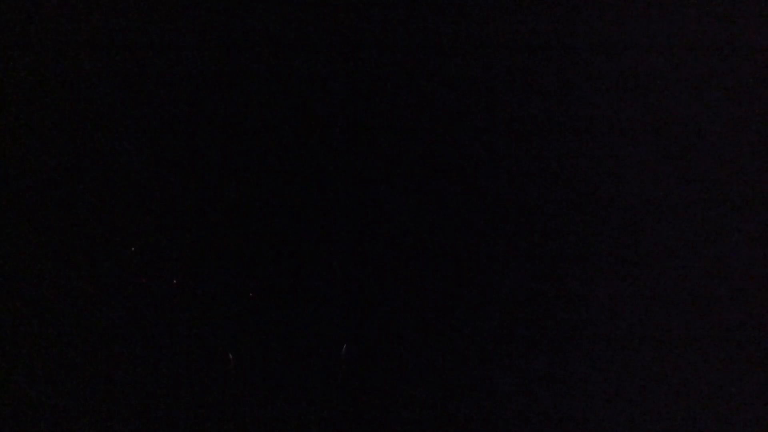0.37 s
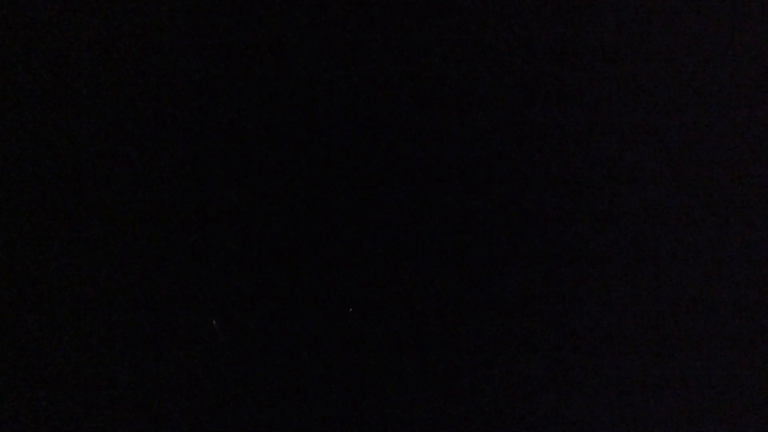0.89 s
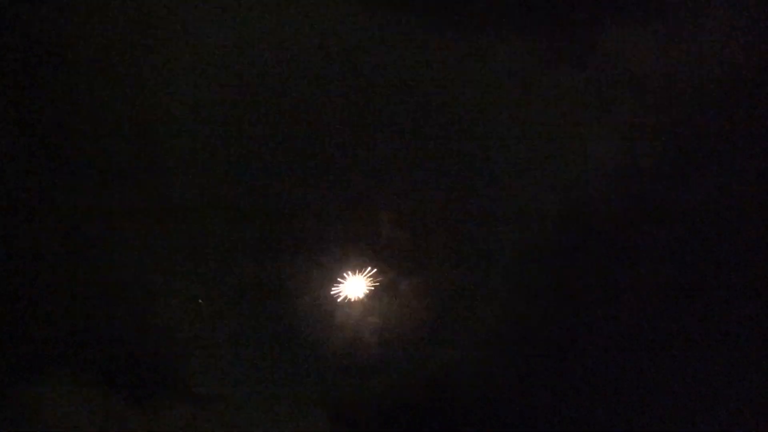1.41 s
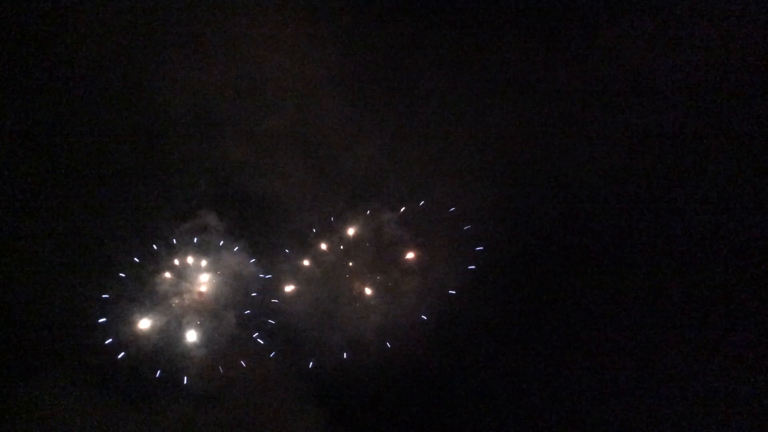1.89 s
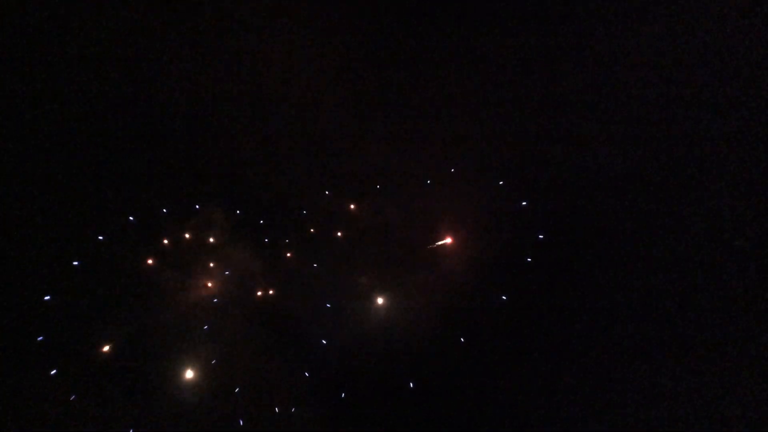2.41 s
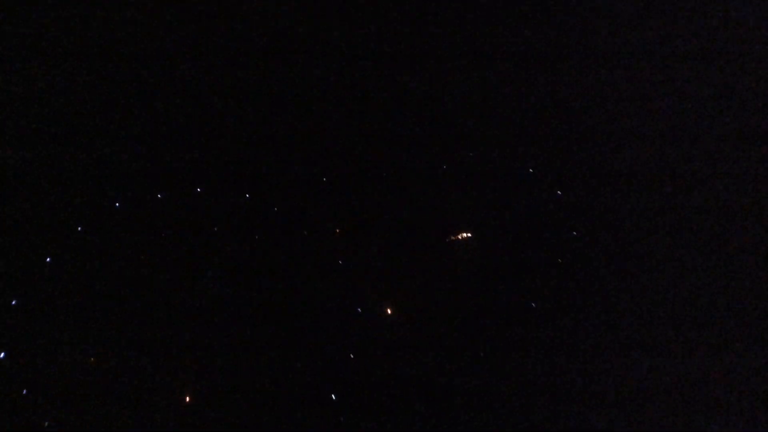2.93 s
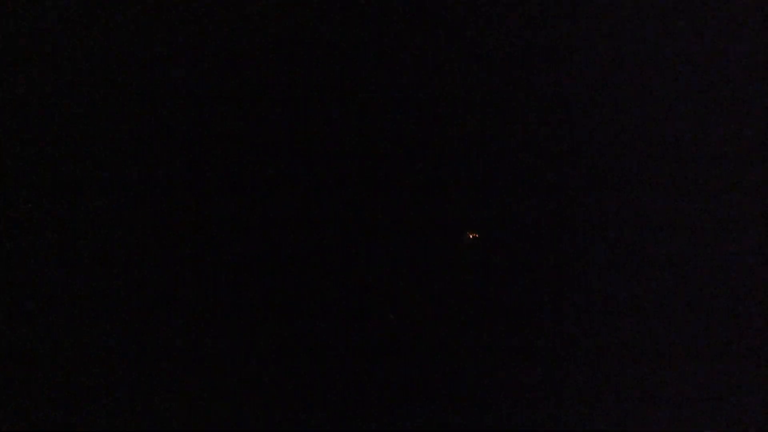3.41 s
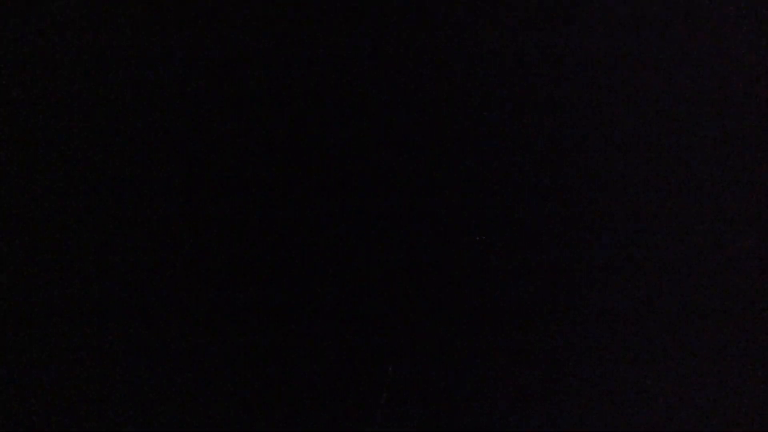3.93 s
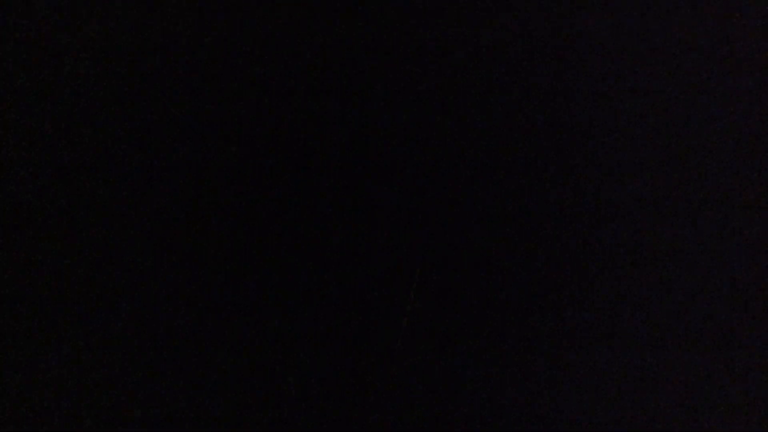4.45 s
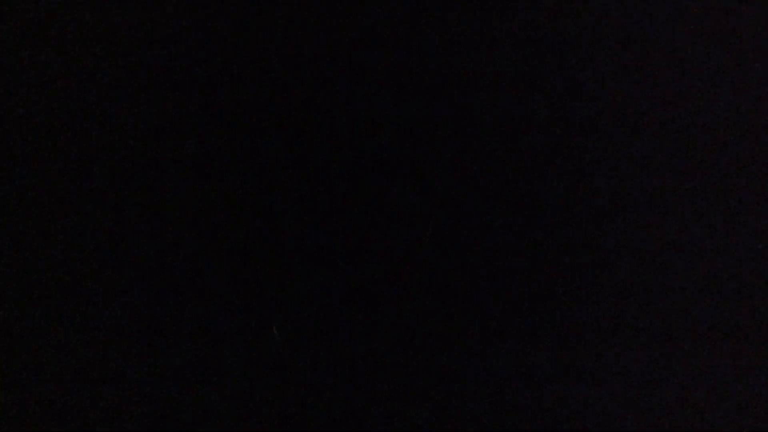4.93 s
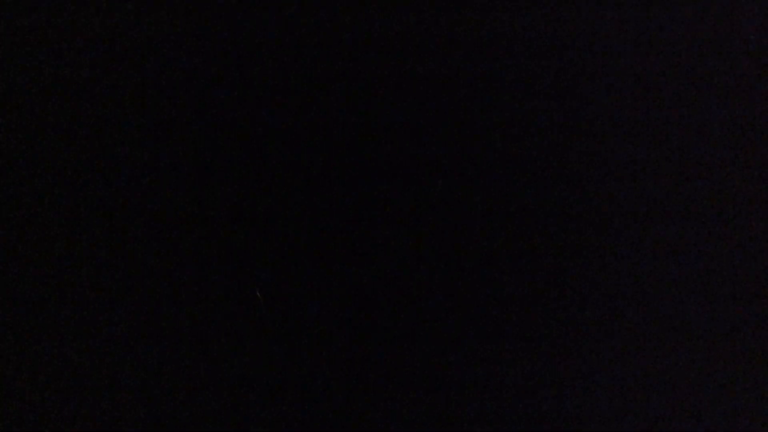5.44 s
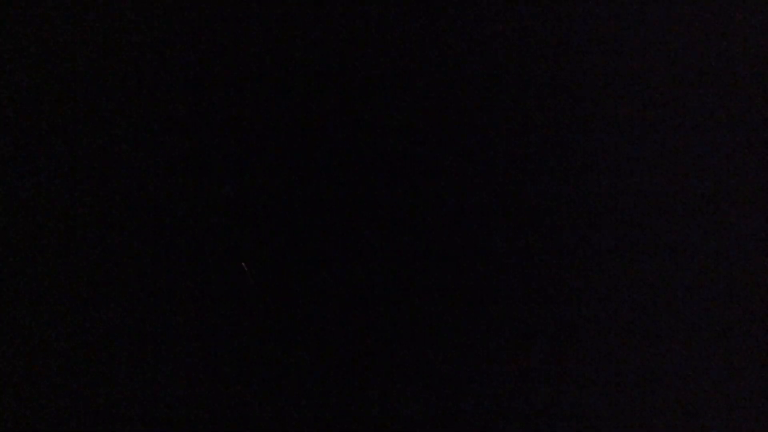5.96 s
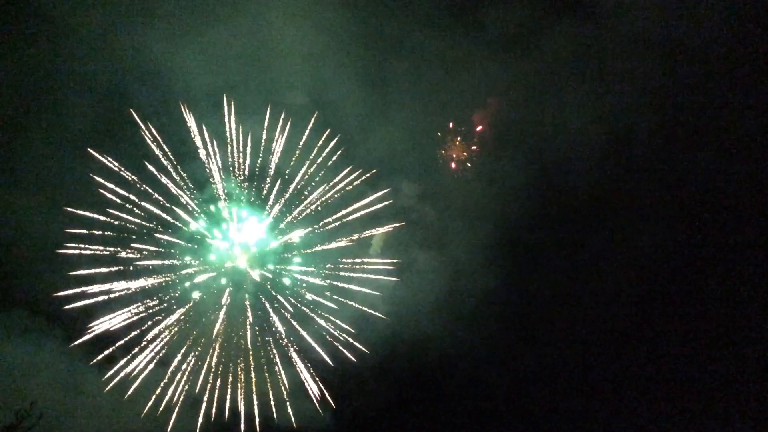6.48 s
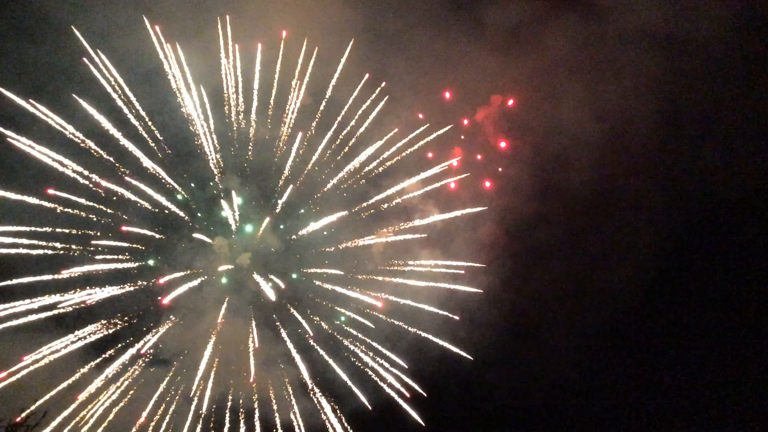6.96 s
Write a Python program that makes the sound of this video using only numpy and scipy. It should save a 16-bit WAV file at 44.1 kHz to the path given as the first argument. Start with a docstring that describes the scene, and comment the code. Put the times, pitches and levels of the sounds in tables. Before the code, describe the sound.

Outdoors at night, the dull roll of an earlier firework fades over low distant rumble and faint rasping crickets. Around two seconds, two hard shell bangs come close together with thuds and small cracks, their echoes rolling back from trees. A tight run of distant hollow mortar launches follows, then a quiet wait with crickets. Near the end two more sharp bangs burst, their echoes cut short. Small microphone, bass-thin, loud peaks rounded.

```python
"""The fading roll of a firework burst is heard first, over a low distant rumble and rasping bush crickets.
More shells burst overhead in the night and mortars launch others from a field. Each bang is a short pressure
wave that slaps off the ground and nearby walls, then rolls back from a far tree line as thousands of small
reflections, duller the longer their path. Crickets are noise scraped in strokes through ringing wings."""
import sys
import numpy as np
from scipy import signal
from scipy.io import wavfile
from scipy.ndimage import uniform_filter1d

SR = 44100
rng = np.random.default_rng(int(sys.argv[2]) if len(sys.argv) > 2 else 0)


def transcribe(u):
    """Save the signal u as a 16-bit wav file named by the first command-line argument.

    u: samples, shape (n,) or (channels, n), limited to [-1, 1]; the rate is SR.
    q: integer samples, one column per channel.
    """
    v = np.clip(np.atleast_2d(u).T, -1, 1)
    q = np.round(v * 32767).astype(np.int16)
    wavfile.write(sys.argv[1], SR, q)


def voltage_ratio(level):
    """Linear amplitude factor for a level in decibels (scalar or array-like)."""
    return 10 ** (np.asarray(level, float) / 20)


N = 313110  # length of the scene in samples
WALL_S = .0122  # delay of the slap from the nearest wall, in seconds


def evened(x):
    """Scales to rms 1."""
    return x / np.sqrt(np.mean(x ** 2) + 1e-20)


def read(points, hz):
    """Reads a spectrum table, with frequency on a log axis."""
    f, value = np.transpose(points)
    return np.interp(np.log(hz + 1), np.log(f + 1), value)


def add(mix, s, sound):
    """Mixes a sound in at time s; what falls outside is dropped."""
    at = round(s * SR)
    sound = sound[max(-at, 0):]
    part = mix[max(at, 0):][:len(sound)]
    part += sound[:len(part)]


def ring(x, modes):
    """Passes x through resonances side by side, each peaking at its own level."""
    out = np.zeros(len(x))
    for hz, width, db in modes:
        b, a = signal.iirpeak(hz, hz / width, SR)
        out += voltage_ratio(db) * signal.lfilter(b, a, x)
    return out


# Colour of the night. Each row: frequency in Hz, relative level in dB per Hz.
NIGHT_COLOUR = [(15, -53), (25, -26), (55, -16), (123, -2), (179, 0), (222, -3), (316, -15), (425, -12),
                (834, -15), (2090, -32), (3680, -49), (7800, -57), (9990, -51), (14600, -57), (15800, -65)]


def night():
    """Far rumble and hiss: coloured noise whose level drifts in patches of time and pitch."""
    frames, hz = N // 256 + 5, np.fft.rfftfreq(1024, 1 / SR)
    real, imaginary, patches = rng.standard_normal(size=(frames, 513, 3)).T
    patches = uniform_filter1d(patches, size=10, axis=0)  # smooth over pitch
    patches = evened(uniform_filter1d(patches, size=20, axis=1))  # smooth over time
    level_db = read(NIGHT_COLOUR, hz)[:, None] + 1.2 * patches
    spectrum = (real + 1j * imaginary) * voltage_ratio(level_db)
    sound = signal.istft(spectrum, nperseg=1024, noverlap=768)[1][:N]
    return voltage_ratio(-45) * evened(sound)


# One faint peep, perhaps a far insect. The row: start in seconds, length in seconds, pitch in Hz,
# level in dB before its swell and fade.
PEEP_TONE = (.93, .05, 3500, -76)


def peep():
    """A short, slightly fuzzy tone: noise through one narrow resonance."""
    s, length, hz, db = PEEP_TONE
    out, t = np.zeros(N), np.arange(0, length, 1 / SR)
    tone = evened(ring(rng.standard_normal(len(t)), [(hz, 90, 0)]))
    add(out, s, voltage_ratio(db) * np.sin(np.pi * t / length) * tone)
    return out


# Phrases of chirps, near and far. Each row: first chirp in seconds, number of chirps, seconds between chirps,
# first and last chirp's level in dB before random changes, tooth shaping and ringing.
NEAR_CHIRPS = [(.092, 4, .135, -62, -61), (.944, 8, .1365, -62, -57), (1.106, 3, .13, -60, -62),
               (3.552, 6, .134, -62, -63), (4.673, 5, .132, -63, -62), (5.589, 8, .134, -62, -64)]
FAR_CHIRPS = [(.68, 3, .152, -69, -68), (1.475, 2, .153, -68, -65), (2.975, 4, .142, -67, -68),
              (4.124, 12, .153, -68, -67), (6.28, 3, .138, -67, -68)]
# Ring of the wings. Each row: frequency in Hz, width in Hz, peak level in dB.
NEAR_WING_RING = [(9400, 600, -3), (10300, 800, 0), (11800, 1000, -16)]
FAR_WING_RING = [(9100, 700, -1), (10800, 1500, -1), (12400, 1300, -4)]


def crickets(phrases, wing, narrowing):
    """Each chirp is two wing strokes; each stroke scrapes a row of teeth that ring the wing."""
    scrape = np.zeros(N)
    t = np.arange(4400) / SR - .025
    stroke_s, gap_s, teeth_hz = .014, .045, 290  # the teeth pass at this rate on average
    # the second stroke is wider
    stroke = np.exp(-(t / stroke_s) ** 2) + np.exp(-((t - gap_s) / (1.3 * stroke_s)) ** 2)
    for start, chirps, period, first_db, last_db in phrases:
        for k, db in enumerate(np.linspace(first_db, last_db, round(chirps))):
            late, loud = rng.standard_normal(size=2)
            waver = evened(uniform_filter1d(rng.standard_normal(len(t)), size=200))
            tooth_phase = np.cumsum(teeth_hz * (1 + .12 * waver)) / SR % 1
            teeth = .5 + 1.1 * np.exp(-tooth_phase / .13)
            level = voltage_ratio(db + 1.1 * loud + 1.5 * waver)
            sound = level * stroke * teeth * rng.standard_normal(len(t))
            add(scrape, start + k * period + t[0] + .002 * late, sound)
    return ring(ring(scrape, wing), narrowing)


def blast(length_ms, soft_ms):
    """N-shaped pressure wave: a jump, a straight slope through zero, a rounder jump back."""
    u = np.arange(1500) / SR * 1000 / length_ms  # time in blast lengths
    wave = (2 * np.minimum(u, 1) - 1) * np.exp(-.35 * u - np.maximum(u - 1, 0) / .2)
    r = np.exp(-1000 / (SR * soft_ms))  # smoothing that rounds the front
    return signal.lfilter([(1 - r) ** 2], [1, -2 * r, r * r], wave)


# Belts of land that send a bang back, near to far. Each row: delay in seconds, rise in seconds,
# relative level in dB above and then below roughly 260 Hz, fade in dB per second before other losses.
LAND_BELTS = [(0, .02, -5, 1, 85), (0, .03, -1.5, -13, 34), (.1, .05, -6, -11, 32), (.43, .06, 2, -13, 34),
              (.59, .13, 2.5, -11, 16), (1.15, .2, -9, -9, 20)]


def belts(t, near_db):
    """High and low level in dB against delay: each belt swells, then fades; the nearest get near_db more."""
    power = np.full((2, len(t)), 1e-9)
    for delay, rise, high_db, low_db, fade_db in LAND_BELTS:
        late = np.maximum(t - delay, 0)
        shape = np.minimum(late / rise, 1) * voltage_ratio(-fade_db * np.maximum(late - rise, 0))
        nearness = voltage_ratio(near_db * (delay < .3))  # belts around the field itself
        power += np.outer(voltage_ratio([high_db, low_db]), shape * nearness) ** 2
    return 10 * np.log10(power)


# What the air does to an echo. Each row: frequency in Hz, change in dB per second of path.
AIR_CHANGE = [(170, 1), (500, -9), (850, 0), (2000, -5), (4000, -13), (5500, -25), (8000, -45),
              (12000, -64), (16000, -78)]


def land(colour_db, near_db, shadow_db):
    """Thousands of small reflections, some large; the air takes more treble from the later ones,
    and a source near the ground loses a further shadow_db each second."""
    t = np.arange(3 * SR) / SR
    sign, chance, size = rng.random(size=(len(t), 3)).T
    taps = np.sign(sign - .5) * (chance < .3) * voltage_ratio(-2.2 * np.log(size + 1e-3))
    clumps = evened(uniform_filter1d(rng.standard_normal(len(t)), size=900))  # hedges and gaps
    taps = evened(taps * voltage_ratio(1.3 * clumps))
    taps = taps * voltage_ratio(belts(t, near_db)[0] - shadow_db * t)
    hz, s, spectrum = signal.stft(taps, SR, nperseg=1024)
    colour = evened(voltage_ratio(colour_db(hz)))
    high_db, low_db = belts(s + 1 / SR, near_db)
    low = 1 / (1 + (hz / 260) ** 6)  # share of each frequency that follows the low level
    path_db = np.outer(read(AIR_CHANGE, hz), s - .12) + np.outer(low, low_db - high_db)
    return signal.istft(spectrum * colour[:, None] * voltage_ratio(path_db), nperseg=1024)[1]


# Colour of a burst's echoes. Each row: frequency in Hz, relative level in dB per Hz.
BURST_COLOUR = [(15, -55), (25, -28), (55, -14), (85, -4), (110, 3), (178, 2), (270, -19), (400, -15),
                (871, -23), (1050, -21), (1270, -23), (2300, -23), (3200, -27), (5000, -30), (6550, -36),
                (10000, -34), (15500, -46)]


def burst_db(hz):
    """Spectrum that a burst sends into the land."""
    return read(BURST_COLOUR, hz)


# Ring of the mortar tube. Each row: frequency in Hz, width in Hz, relative peak level in dB.
TUBE_RING = [(1300, 300, -7), (2000, 220, 0), (2600, 260, -9), (3350, 200, -12), (5000, 1500, -15),
             (8300, 1200, -23)]


def tube_db(hz):
    """Spectrum of a launch: the ring of the tube over a low thump, with a dull top."""
    peaks = sum(voltage_ratio(2 * db) / (1 + (2 * (hz - f) / w) ** 2) for f, w, db in TUBE_RING)
    thump = voltage_ratio(2 * (burst_db(hz) + 17))
    return 10 * np.log10(peaks + thump) - 10 * np.log10(1 + (hz / 5600) ** 6)


# Mortar launches. Each row: start in seconds, jet level in dB before its rise and fade, jet rise in seconds,
# jet length in seconds before its tail, thump level in dB before softening, thump length in ms.
MORTARS = [(3.6385, -30, .002, .04, -24, 4), (3.7075, -23.5, .001, .024, -30, 4),
           (3.7525, -11, .005, .0075, -1, 6.8), (3.7945, -14, .004, .006, -3, 4.5)]


def launches():
    """A sputtering gas jet rings the tube, then the charge thumps out."""
    out, t = np.zeros(N), np.arange(6000) / SR
    far = signal.butter(1, 3800, fs=SR)  # the launch field lies far off, so the top is dull
    for s, jet_db, rise, length, thump_db, thump_ms in MORTARS:
        sputter = voltage_ratio(3 * evened(uniform_filter1d(rng.standard_normal(len(t)), size=60)))
        gas = signal.filtfilt(*far, rng.standard_normal(len(t)) * sputter)
        jet = evened(ring(gas, TUBE_RING))
        tail = 1.9 * np.sqrt(length) * np.exp(-np.maximum(t - length, 0) / .035)
        shape = np.minimum(t / rise, 1) * (.6 * (t < length) + tail)
        add(out, s, voltage_ratio(jet_db) * jet * uniform_filter1d(shape, size=90))
        add(out, s + rise, voltage_ratio(thump_db) * blast(thump_ms, soft_ms=.65))
        # the wall's slap is softer and rounder
        add(out, s + rise + WALL_S, voltage_ratio(thump_db - 6) * blast(thump_ms, soft_ms=.8))
        energy_db = jet_db + 10 * np.log10(length / .02)  # a longer jet wakes more echo
        add(out, s, voltage_ratio(energy_db - 13) * land(tube_db, near_db=-3.5, shadow_db=9))
    return out


# Dull thuds around the bursts: two lead their burst by about 10 ms, the rest follow it, perhaps echoes off
# farther walls. Each row: start in seconds, level in dB before softening, length in ms.
DULL_THUDS = [(2.0055, -7, 4), (2.0575, -12, 3.5), (2.0680, -6, 3.5), (2.1905, -14, 3.5),
              (6.6845, -15, 2.5), (6.7070, -7, 6), (6.7360, -4, 4.5), (6.7430, -7, 4), (6.7585, -6, 5.5)]


def thuds():
    """Pressure waves with a front rounded in proportion to their length."""
    out = np.zeros(N)
    for s, db, length_ms in DULL_THUDS:
        add(out, s, voltage_ratio(db) * blast(length_ms, soft_ms=.12 * length_ms))
    return out


# Sharp small cracks after the bursts. Each row: start in seconds, level in dB before softening, length in ms.
SMALL_CRACKS = [(2.0335, -14, 2), (2.0712, -13, 1), (2.0960, -17, 1.5), (7.0120, -20, 2)]


def cracks():
    """Short pressure waves with a steep front."""
    out = np.zeros(N)
    for s, db, length_ms in SMALL_CRACKS:
        add(out, s, voltage_ratio(db) * blast(length_ms, soft_ms=.05))
    return out


# Bursts in the air. Each row: start in seconds, direct blast and ground slap in dB before softening,
# slap delay in ms, blast length in ms, shell size in dB (sets the crack, splinters and echoes).
AIR_BURSTS = [(-0.8, -10, 0, 4.1, 3.5, -36), (2.0160, -10, 0, 4.3, 3.5, -20.5),
              (2.1520, -8, 0, 3.9, 3.6, -23.5), (6.6953, -10, -8, 4, 2.5, -19.5),
              (6.9356, -1, -5, 5, 2.2, -28)]


def shells():
    """Each burst: a crack on the shock front, the blast, splinters, ground and wall slaps, the roll of the land."""
    out, t = np.zeros(N), np.arange(400) / SR
    for s, direct_db, ground_db, ground_ms, length_ms, size_db in AIR_BURSTS:
        crack = np.diff(rng.standard_normal(size=len(t)), prepend=0) * np.exp(-t / .0004)
        add(out, s, voltage_ratio(.9 * size_db + 3) * crack)
        add(out, s, voltage_ratio(direct_db) * blast(length_ms, soft_ms=.04))
        for late, luck in rng.random(size=(7, 2)):  # the casing tears in a ragged run of small shocks
            splinter_db = 2 * size_db + 34 - 8 * luck
            add(out, s + .009 * late, -voltage_ratio(splinter_db) * blast(length_ms=.5, soft_ms=.035))
        add(out, s + ground_ms / 1000, voltage_ratio(ground_db) * blast(length_ms, soft_ms=.06))
        add(out, s + WALL_S, voltage_ratio(ground_db - 3) * blast(length_ms, soft_ms=.4))
        add(out, s, voltage_ratio(size_db) * land(burst_db, near_db=0, shadow_db=0))
    return out


def scene():
    """All sources at one microphone."""
    # a last broad resonance narrows each wing's tone and lifts its peak by 4 dB
    near = crickets(NEAR_CHIRPS, NEAR_WING_RING, narrowing=[(10100, 1400, 4)])
    far = crickets(FAR_CHIRPS, FAR_WING_RING, narrowing=[(10800, 3500, 4)])
    insects = near + far + peep()
    bangs = launches() + thuds() + cracks() + shells()
    return (night() + insects + bangs)[None]


# Resonance of the microphone port. Each row: frequency in Hz, width in Hz, peak level in dB.
PORT_RING = [(8200, 400, -4)]


def microphone(dry):
    """A small microphone loses the deepest bass, rings near 8 kHz, rounds loud peaks and ends below 16 kHz."""
    cut = signal.lfilter(*signal.butter(1, 75, "high", fs=SR), dry)
    cut = cut + ring(cut[0], PORT_RING)
    ceiling = 1.3
    rounded = ceiling * np.tanh(cut / ceiling)
    edge = signal.firwin(255, 15300, fs=SR)
    return signal.oaconvolve(rounded, edge[None], "same")


def top_cut(x):
    """Nothing passes above the cut-off."""
    return signal.sosfilt(signal.butter(12, 16470, fs=SR, output="sos"), x)


def record(dry):
    """The finished mix as the small microphone picks it up."""
    mix = microphone(dry)
    return top_cut(mix)


dry = scene()
out = record(dry)
transcribe(out)
```